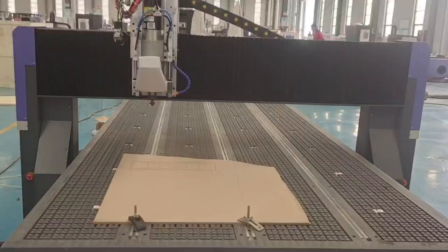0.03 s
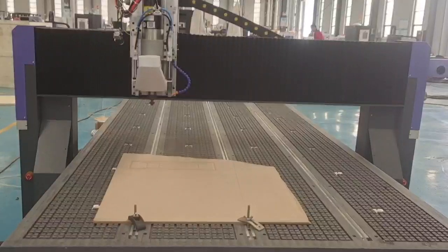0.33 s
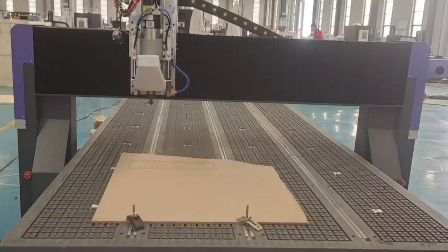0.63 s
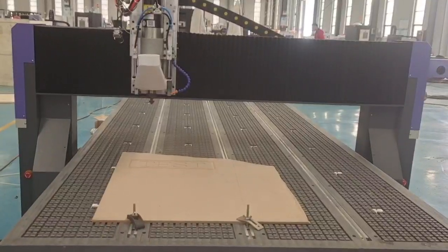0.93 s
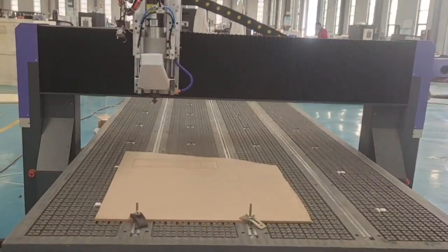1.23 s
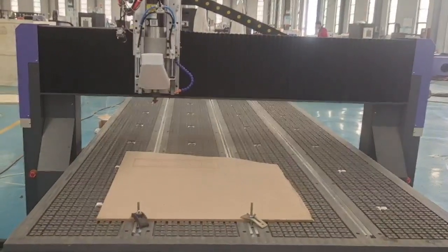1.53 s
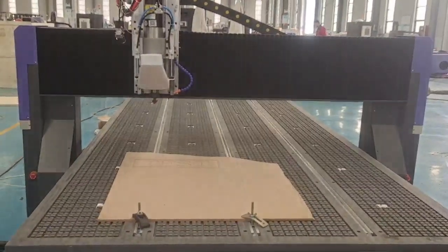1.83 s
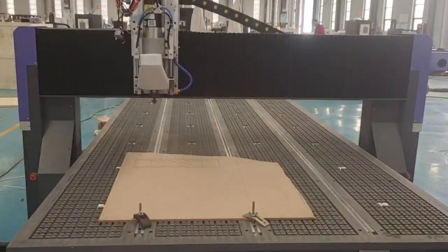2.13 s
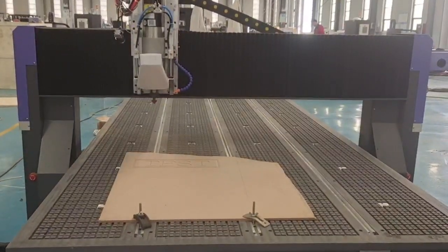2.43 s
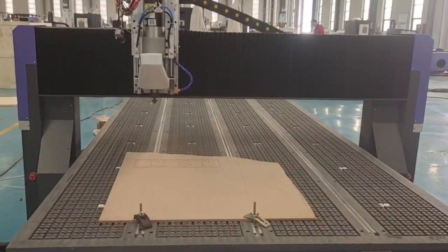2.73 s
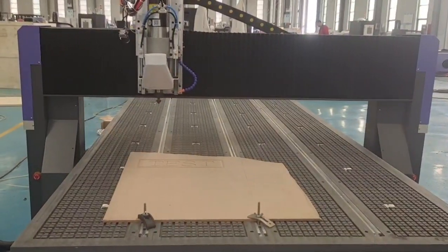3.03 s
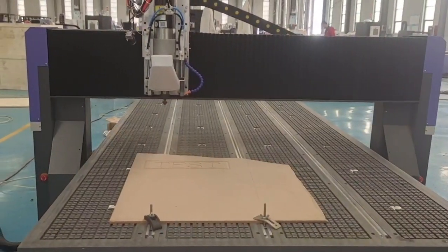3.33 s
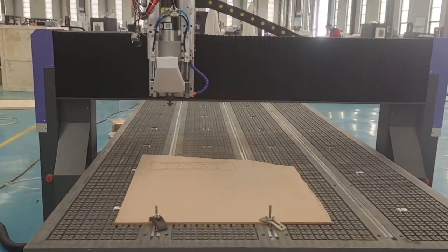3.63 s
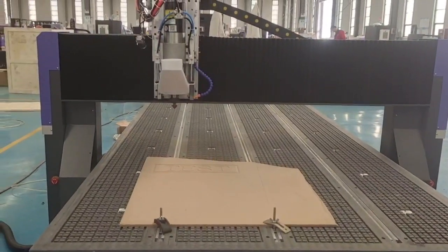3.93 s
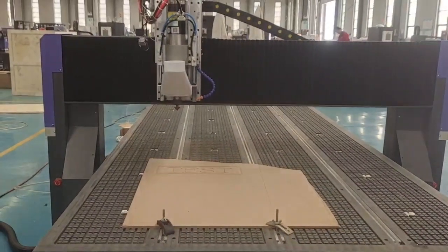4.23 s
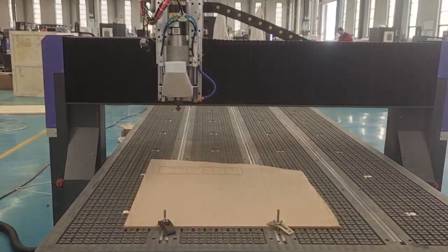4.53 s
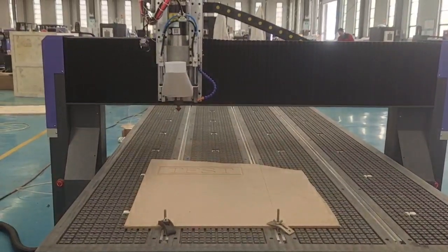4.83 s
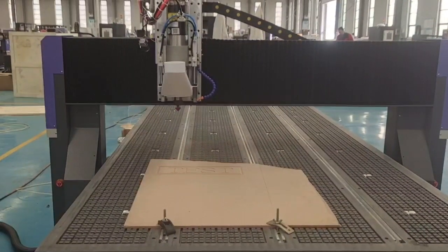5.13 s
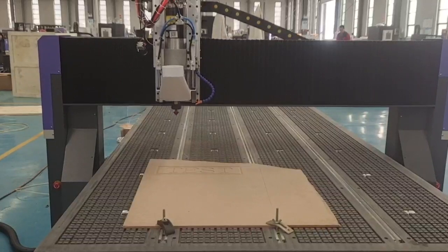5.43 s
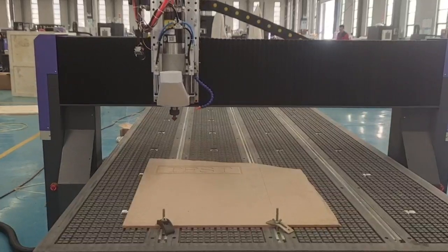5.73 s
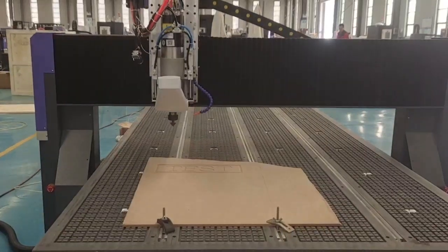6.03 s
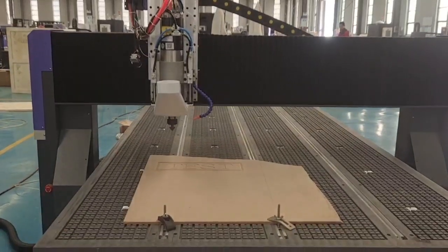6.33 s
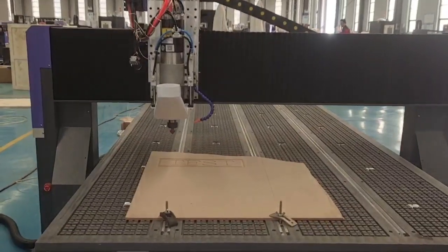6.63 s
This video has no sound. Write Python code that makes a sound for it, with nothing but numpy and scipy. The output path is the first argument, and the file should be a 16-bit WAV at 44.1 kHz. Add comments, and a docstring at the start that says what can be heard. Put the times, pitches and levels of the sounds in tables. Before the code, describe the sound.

A router spindle whines up in pitch to a loud hum in a factory hall, with air puffs and a late rattle.

```python
"""A CNC router spins up

The spindle runs up to full speed in a big factory hall. Unbalance makes it hum, and the hum swells
and fades as it sweeps through the hall's standing waves. Rotor slots and inverter whistle above it.
Compressed air puffs a few times; near full speed the bearings buzz and the head starts to rattle.
Machine parts ring, and behind it all the hall rumbles, a fan rushes and air hisses."""
import sys
import numpy as np
from scipy import signal
from scipy.io import wavfile
from scipy.ndimage import uniform_filter1d

SR = 44100
rng = np.random.default_rng(int(sys.argv[2]) if len(sys.argv) > 2 else 0)


def int16_out(signal):
    """Quantize to a 16-bit WAV file."""
    q = np.round(np.clip(np.atleast_2d(signal).T, -1, 1) * 32767)
    wavfile.write(sys.argv[1], SR, q.astype(np.int16))


N = 298998
START_S = .185
SIDES = np.array([[1], [-1]])   # left, right
# In the tables, pan is how much louder the left side is; lead is how far its wave runs ahead.

# The inverter (the motor's power supply) ramps up the turns per second: t/s, speed/Hz
SPEED_RAMP = [(0, 100.3), (5.245, 399.7), (5.9, 399.8), (6.3, 399.4), (6.78, 399.9)]
def spindle_speed():
    """Turns per second at every sample."""
    return in_time(SPEED_RAMP)[0]


# The hum between its dips: t/s, level/dB, pan/dB, lead/rad
HUM_CURVE = [(0.41, -62, 2, 0.39), (0.68, -52, -1, 0.19), (1.26, -55.5, -0.4, 0.29), (1.34, -39, 2, -0.14),
             (1.55, -42.5, -1, -0.15), (2.02, -36.5, -1, -0.082), (2.33, -26.5, 0, 0.18),
             (2.81, -22, -1, 0.2), (2.94, -33, -6, 0.54), (3.07, -23, 3, 0.39), (3.54, -26, -5, 0.57),
             (3.61, -24, -3.5, 0.39), (4.13, -22.5, 2, 0.063), (4.5, -14, 0, 0.42), (4.55, -23, 1, 0.29),
             (4.71, -15.5, -1, -0.0028), (5.05, -15, 0, 0.37), (5.61, -19, -2, 0.24),
             (5.69, -21.5, -3, 0.5), (6.04, -14.5, -2.5, 0.4), (6.51, -15, -1, 0.13),
             (6.78, -19.5, -0.5, 0.081)]
def shaft_hum(turns):
    """Unbalance shakes the head once a turn; the hum flutters while the speed climbs."""
    level_db, pan_db, lead = in_time(HUM_CURVE)
    gain, shift = standing_waves()
    flutter_db = climbing() * (1 - 1.5 * speed_octaves()) * drift(14.7)
    return gain * from_db(level_db + flutter_db) * pan(pan_db) * tone(turns + shift, lead)


# Dips in the hum: t/s, half width/s, depth/dB, right ear's delay/s
HUM_DIPS = [(1.397, 0.032, -17.5, -0.005), (1.465, 0.026, -4, -0.005), (1.69, 0.02, -23, -0.0064),
            (1.809, 0.017, -18, -0.0028), (2.247, 0.056, -5, -0.003), (2.415, 0.021, -9.5, -0.0024),
            (2.53, 0.086, -17.5, -0.0077), (2.64, 0.045, -9.5, -0.0089), (2.865, 0.081, -23, -0.008),
            (3.026, 0.051, -15.5, -0.017), (3.224, 0.026, -10.5, -0.015), (3.364, 0.022, -32.5, -0.002),
            (3.439, 0.024, -24, 0.0099), (3.804, 0.081, -13.5, -0.012), (3.964, 0.034, -13, -0.0024),
            (4.144, 0.047, -39, 0.012), (4.231, 0.024, -14.5, -0.0092), (4.381, 0.11, -28, 0.008),
            (4.446, 0.074, -23, -0.013), (4.906, 0.032, -9.5, -0.019), (4.985, 0.061, -8.5, -0.033),
            (5.153, 0.019, -12.5, -0.012), (5.261, 0.067, -27, 0.018), (5.345, 0.042, -14, -0.0014)]
def standing_waves():
    """The hall's echoes cancel the gliding hum, in each ear at its own moment: (gain, shift in cycles)."""
    path = np.ones((2, N), complex)
    for dip_s, width_s, depth_db, right_later_s in HUM_DIPS:
        away = (clock() - dip_s + SIDES * right_later_s / 2) / width_s
        path *= (away + 1j * from_db(depth_db)) / (away + 1j)
    return np.abs(path), np.angle(path) / (2 * np.pi)


# Higher tones of the hum: multiple of the speed, start t/s, level/dB, extra while climbing/dB,
# level while shaking/dB, pan/dB, lead at full speed/rad, lead while climbing/rad
OVERTONES = [(2, 3.9, 0, 4, -21, -3, -0.9, -0.5), (3, 2.5, 5.5, -1, -41, 2, 2.4, -0.6)]
def hum_overtones(turns, rise_s=0.11, db_per_octave=16):
    """Two overtones sweep through the gantry's resonances and swell when the head shakes."""
    shaking = swell(peak_s=6.37, spread_s=0.24)
    out = np.zeros((2, N))
    for order, start_s, db, load_db, shake_db, pan_db, steady_lead, climb_lead in OVERTONES:
        lead = steady_lead + (climb_lead - steady_lead) * climbing()
        drive_db = db + load_db * climbing() + db_per_octave * speed_octaves()
        running = ramp(start_s, rise_s) * gantry_gain(order * spindle_speed()) * from_db(drive_db)
        level = np.hypot(running, from_db(shake_db) * shaking)
        gain, shift = fading(share=0.15, rate=12)
        waver = from_db(drift(18))
        wave = tone(order * turns + shift, lead + 0.79 * drift(1.9))
        out += gain * level * waver * wave * pan(pan_db + 1.8 * drift(1.5))
    return out


# Pitches at which the gantry likes to vibrate: f/Hz, width/Hz, level/dB
GANTRY_RESONANCES = [(660, 95, -45), (745, 60, -34.5), (788, 26, -39), (836, 20, -30.5), (929, 55, -41.5),
                     (1064, 70, -51), (1190, 90, -49)]
def gantry_gain(hz):
    """The gantry, the bridge that carries the head, favours tones near its resonances."""
    gains = [from_db(db) / (1 + (2 * (hz - centre) / width) ** 2)
             for centre, width, db in GANTRY_RESONANCES]
    return np.sqrt(sum(gain ** 2 for gain in gains))


# How the motor housing passes on each pitch: f/Hz, level/dB, pan/dB, lead/rad
HOUSING_RESPONSE = [(2800, -68, -1, 1), (3150, -61, -1, 1.3), (3450, -55, 0, 1.7), (3750, -50, 0, 1.5),
                    (4000, -49, -3, 2), (4300, -43, -4, 1.7), (4500, -49, 2, .9), (4700, -57, 0, 2),
                    (4900, -42, 2, 2.7), (5100, -35.5, 3, 2.7), (5420, -37, 0, 2.8), (5620, -28, 2, 3),
                    (5780, -27, 1, 2.9), (5950, -29, 6, 2.3), (6200, -30.5, 1, 2.7), (6450, -36, 0, 2.9),
                    (6750, -38, 3, .7), (7000, -38.5, 3, 1), (7250, -39, 9, 2), (7550, -45, 10, 1.7),
                    (7850, -55, 5, .8), (8250, -52, 6, .2), (8500, -57, 3, 2), (8730, -47, 5, 1.4),
                    (9100, -51, 3, 1.5), (10500, -62, 0, 1.5)]
# The whistles: base f/Hz, multiple of the speed added to it, relative level/dB, start t/s
WHISTLE_TONES = [ (0, 22, 0, .6), (0, 26.025, -12, 1.5), (0, 28.025, -22, 1.6), (12000, -22, -22, 1.8),
                 (6000, 16, -19, .95), ]
def motor_whistle(turns, rise_s=0.14, unloaded_db=-20):
    """Rotor slots chop the magnetic field, and the inverter adds a rising and a falling tone."""
    housing_hz, *columns = np.transpose(HOUSING_RESPONSE)
    out = np.zeros((2, N))
    for base_hz, order, db, start_s in WHISTLE_TONES:
        hz = base_hz + order * spindle_speed()
        housing_db, pan_db, lead = [np.interp(hz, housing_hz, column) for column in columns]
        gain, shift = fading(share=0.35, rate=16)
        wave = tone(base_hz * clock() + order * turns + shift, lead)
        out += ramp(start_s, rise_s) * gain * from_db(db + housing_db) * pan(pan_db) * wave
    load_db = -0.5 + unloaded_db * (1 - climbing())   # quieter once the speed is steady
    return in_hall(out * from_db(load_db), wet_db=-5)


# Resonances that the buzz glides through: f/Hz, level/dB
BUZZ_SPECTRUM = [(1400, -50.5), (1600, -50.5), (1900, -52), (2000, -58), (2250, -56), (2400, -52),
                 (2600, -54.5), (2800, -46.5), (3000, -50), (3200, -52), (3600, -52), (3800, -68),
                 (4000, -52), (4200, -64), (4400, -55), (4700, -56.5), (5200, -59), (5600, -59.5),
                 (6000, -61.5), (6800, -56.5), (7200, -58), (7600, -75), (8800, -91)]
def bearing_buzz(turns, db_per_octave=17, early_db=-14):
    """The bearings break into a buzz near full speed and chirp while the speed climbs."""
    orders = np.arange(4, 23)
    level_db = db_per_octave * speed_octaves() + early_db * (1 - ramp(start_s=4.7, rise_s=0.08))
    tones_db = [at_hz(BUZZ_SPECTRUM, order * spindle_speed()) for order in orders]
    chirp = climbing()
    buzz = tone_stack(turns, orders, tones_db, waver_db=3.5 + 1.5 * chirp, jitter=0.026 + .05 * chirp)
    return from_db(level_db) * buzz


# Tones of the rattle: multiple of the speed, relative level/dB
RATTLE_TONES = [(.5, -48.5), (1.5, -34.5), (2.5, -44.5), (3.5, -49), (4.5, -56), (5.5, -56.5), (6.5, -51),
                (7.5, -50), (8.5, -52.5), (9.5, -74), (10.5, -67.5), (12.5, -56), (13.5, -71.5),
                (14.5, -68)]
# Noise of the rattle: f/Hz, relative level/dB
RUSTLE_SPECTRUM = [(60, -29.5), (150, -6), (230, -7.5), (300, -10), (380, -1), (480, 1), (650, -9.5),
                   (800, -1), (950, 1), (1300, -11.5), (2000, -24), (2900, -6.5), (4000, -21), (5200, -14),
                   (8000, -65.5), (15000, -47.5)]
def head_rattle(turns, tones_db=2, rustle_db=-37.5):
    """Slack in the head rattles on every second turn: its tones swell and fade, its rustle stays."""
    orders = np.arange(15) + .5
    tones = tone_stack(turns, orders, at_hz(RATTLE_TONES, orders), waver_db=3.5, jitter=0.035)
    tones *= from_db(tones_db) * swell(peak_s=6.19, spread_s=0.24)
    knocks = rms_one(1 + 0.32 * np.cos(np.pi * turns))   # the bright part of the rustle pulses
    bands = noise_bands(RUSTLE_SPECTRUM, flicker_db=.6)
    rustle = sum(band * (knocks if hz > 1500 else 1) for hz, band in bands)
    return tones + from_db(rustle_db) * rattling() * rustle


def rattling():
    """0 before the head starts to rattle, 1 once it does."""
    return ramp(start_s=5.19, rise_s=0.36)


# The puffs: t/s, level/dB, rise/s, hold/s, extra thud/dB, extra chatter/dB
PUFF_EVENTS = [(1.523, -52, 0.16, 0.1, 12, 1), (2.292, -38, 0.045, 0.098, 0.5, 2.5),
               (3.093, -46, 0.056, .05, -2, -7), (3.174, -32, 0.031, 0.064, 1, -2.5),
               (5.6, -40, 0.24, 0.05, -11.5, -2.5)]
# Their noise: f/Hz, relative level/dB
PUFF_SPECTRUM = [(50, -47), (160, 1.5), (300, -2.5), (500, -2), (750, -4), (1200, 5), (1700, -5.5),
                 (2800, 4), (3700, -9), (4600, -5.5), (6000, -22.5), (9000, -46), (15000, -55)]
def air_puffs(thud_hz=600, t60_s=1.6):
    """Compressed air swells, holds briefly and dies away in the hall, with a metallic chatter in it."""
    body, thud, metal = np.zeros((3, N))
    for start_s, db, rise_s, hold_s, thud_db, chatter_db in PUFF_EVENTS:
        tail_db = -60 * np.maximum(clock() - start_s - rise_s - hold_s, 0) / t60_s
        puff = ramp(start_s, rise_s) * from_db(db + tail_db)
        body = np.hypot(body, puff)   # overlapping puffs add in power
        thud = np.hypot(thud, puff * from_db(thud_db))
        metal = np.hypot(metal, puff * from_db(chatter_db))
    bands = noise_bands(PUFF_SPECTRUM, flicker_db=1.2)
    air = sum(band * (thud if hz < thud_hz else body) for hz, band in bands)
    return air + metal * chatter()


# Pitches of the loose metal: f/Hz, width/Hz, relative level/dB
METAL_RESONANCES = [(1086, 120, -5), (1379, 80, -9.5), (1866, 110, -10.5), (2470, 90, -5), (2790, 88, -1.5),
                    (3030, 74, -5), (3600, 130, -2), (3940, 210, -10), (4060, 99, -14.5),
                    (5100, 200, -12.5)]
def chatter(taps_per_s=110, spread_db=2):
    """Loose metal is tapped at random; each tap rings every pitch with its own strength."""
    taps = (rng.random(N) < taps_per_s / SR) * from_db(spread_db * rng.uniform(-1, 1, N))
    out = np.zeros((2, N))
    for hz, width_hz, db in METAL_RESONANCES:
        strikes = taps * spread(*rng.standard_normal((2, N)), hz)
        ring = signal.lfilter(*signal.iirpeak(hz, hz / width_hz, fs=SR), strikes + 1e-18)
        out += from_db(db) * rms_one(ring)
    return rms_one(in_hall(out, wet_db=7.5))


# Ringing machine parts: t/s, f/Hz, width/Hz, level/dB, time to fade by 60 dB/s
PART_RINGS = [(.185, 176, 34.6, -48, 1.4), (.185, 307.4, 66, -47.5, 1.7), (.3, 962, 25, -51, 2),
              (.44, 383, 40, -47, 0.49), (1.56, 640, 55, -45.5, 2.8), (1.58, 248, 40, -40.5, 0.62),
              (1.63, 2720, 220, -52, 1.9), (2.3, 166, 45.3, -42.5, 1.4), (2.33, 2780, 129, -39.5, 2.1),
              (2.54, 495, 50, -46.5, 1.4), (2.85, 2390, 80, -46.5, 1.5), (3.13, 762, 79.6, -32.5, 1.7),
              (3.17, 179, 61, -42, 1.5), (3.2, 2670, 100, -40, 1.9), (3.32, 590, 29.3, -43, 1.9),
              (3.851, 195, 50, -39, 0.86), (3.98, 198, 40, -42, 0.27), (4.73, 2980, 300, -47.5, 5),
              (5.15, 1357, 80, -46, 3), (5.2, 4370, 200, -44, 0.95), (5.331, 222.3, 34.6, -41.5, 6.6),
              (5.35, 1386, 44.5, -44.5, 3), (5.401, 4960, 448, -48.5, 9), (5.42, 827, 130, -41.5, 12),
              (5.55, 575, 80, -45, 3), (5.58, 4600, 1467, -43, 2.3), (5.9, 630, 50, -34, 1.3),
              (6.15, 720, 40, -32.5, .9), (6.17, 894, 110, -37.5, 10)]
def ringing_parts(rise_s=0.029):
    """Parts ring as the machine starts, takes air and shakes; each lingers in the hall."""
    out = np.zeros((2, N))
    for start_s, hz, width_hz, db, t60_s in PART_RINGS:
        age = np.maximum(clock() - start_s, 0)
        out += ramp(start_s, rise_s) * from_db(db - 60 * age / t60_s) * resonance(hz, width_hz)
    return out


# Rumble and rush over time: t/s, relative rumble level/dB, relative rush level/dB
AIR_LEVELS = [(.185, 5, 7), (.6, 5, 2), (1.4, 3.5, 1.5), (2.1, 3, 5.5), (2.8, 10.5, 7.5), (3.9, 11.5, 13.5),
              (4.7, 1.5, 5.5), (5.2, 2.5, 7.5), (5.8, -0.5, 3.5), (6.78, -15, -28)]
# The background noise: f/Hz, relative level/dB
AIR_SPECTRUM = [(30, -32), (80, -16), (160, -5), (300, -1), (600, -4), (1050, -6), (2000, -11), (2900, -5),
                (3800, -7), (5600, -2.5), (7300, -8), (9500, -17), (12000, -47), (15000, -17)]
# Pitches that sing in the hiss: f/Hz, width/Hz, relative level/dB
HISS_PEAKS = [(1730, 110, -65), (4430, 220, -56), (5510, 150, -57), (7270, 260, -58)]
def background_air(rumble_hz=250, rush_hz=800, hiss_hz=4500):
    """The hall rumbles, the fan rushes, and air hisses through the head, louder with speed."""
    closed = 1 - ramp(START_S, rise_s=0.22)
    hiss_db = 4 + 3 * speed_octaves() - 6 * closed
    levels_db = np.array([*in_time(AIR_LEVELS), hiss_db])
    anchors = np.log([rumble_hz, rush_hz, hiss_hz])
    out = np.zeros((2, N))
    for hz, band in noise_bands(AIR_SPECTRUM, flicker_db=.5):
        # each band blends the three levels by how near it lies to them
        shares = [np.interp(np.log(hz), anchors, row) for row in np.eye(3)]
        out += band * from_db(shares @ levels_db - 45.5)
    singing = sum(from_db(db) * resonance(hz, width_hz) for hz, width_hz, db in HISS_PEAKS)
    return out + from_db(hiss_db - 3) * singing


def bed_echo(x, delay_s=1 / 905, strength=.22):
    """An echo off the machine bed boosts some pitches and weakens others."""
    echo = np.array([np.interp(clock() - delay_s, clock(), side) for side in x])
    return (x + strength * echo) / np.hypot(1, strength)


def in_hall(x, wet_db, early_t60_s=0.089, tail_t60_s=1.2, early_share=0.85):
    """Mix in quick echoes off bed and gantry and the hall's long tail, at about the same total power."""
    t = np.arange(int(tail_t60_s * SR)) / SR
    early = early_share * from_db(-120 * t / early_t60_s) / early_t60_s
    tail = (1 - early_share) * from_db(-120 * t / tail_t60_s) / tail_t60_s
    echoes = rms_one(np.sqrt(early + tail) * rng.standard_normal((2, len(t)))) / np.sqrt(len(t))
    reverb = signal.fftconvolve(x, echoes, axes=1)[:, :N]
    wet = from_db(wet_db)
    return (x + wet * reverb) / np.hypot(1, wet)


def fading(share, rate):
    """A gliding tone meets changing echoes: (gain, shift in cycles)."""
    echoed = np.clip(share * climbing(), 0, 1)
    path = np.sqrt(1 - echoed) + np.sqrt(echoed / 2) * (drift(rate) + 1j * drift(rate))
    return np.abs(path), np.angle(path) / (2 * np.pi)


# How alike noise is in both ears: f/Hz, likeness (1 or more means the same wave)
EAR_LIKENESS = [(60, 5.5), (250, 1.1), (600, 0.5), (1100, 0.15), (2000, 0), (3200, 0.36), (5500, -0.54),
                (8000, 0.13), (15000, 0.2)]
# Which way it leans: f/Hz, pan/dB
EAR_BALANCE = [(60, -1.3), (400, -1.7), (1200, -0.97), (3000, 1.7), (6000, 1.9), (9000, 1.8), (13000, -1.5)]
def spread(mid, side, hz):
    """Two unrelated noises become one wide stereo sound."""
    alike = np.clip(at_hz(EAR_LIKENESS, hz), -1, 1)
    pair = np.sqrt((1 + alike) / 2) * mid + np.sqrt((1 - alike) / 2) * side * SIDES
    return pair * pan(at_hz(EAR_BALANCE, hz))


def noise_bands(spectrum, flicker_db):
    """Wide stereo noise as (Hz, band) pairs that flicker a little; together about rms 1."""
    edges = np.geomspace(40, 17000, 27)
    centres = np.sqrt(edges[1:] * edges[:-1])
    gains = from_db(at_hz(spectrum, centres))
    gains /= np.sqrt(np.sum(gains ** 2 * np.diff(edges)) / (SR / 2))
    white = rng.standard_normal((2, 2, N))
    for k, hz in enumerate(centres):
        band = signal.butter(2, edges[k:k + 2], "band", fs=SR, output="sos")
        mid, side = signal.sosfilt(band, white[k % 2])
        yield hz, spread(mid, side, hz) * gains[k] * from_db(flicker_db * drift(47))


def resonance(hz, width_hz):
    """Noise ringing around one pitch; rms 1."""
    band = signal.butter(2, [hz - width_hz / 2, hz + width_hz / 2], "band", fs=SR, output="sos")
    return rms_one(spread(*signal.sosfilt(band, rng.standard_normal((2, N))), hz))


def tone_stack(turns, orders, levels_db, waver_db, jitter):
    """Wavering tones at multiples (orders) of the speed; the high ones blur into hiss."""
    out = np.zeros((2, N))
    for order, db in zip(orders, levels_db):
        gain = from_db(db + waver_db * drift(15))
        lead = min(order / 2, 1.5) * rng.choice([-1, 1]) + .5 * drift(4.9)
        out += gain * tone(order * turns + jitter * np.sqrt(order) * drift(16), lead)
    return out


def tone(cycles, lead):
    """Stereo sine of rms 1; the left side leads by so many radians."""
    return np.sqrt(2) * np.sin(2 * np.pi * (cycles + rng.random()) + SIDES * lead / 2)


def climbing():
    """1 while the speed climbs, 0 once it is steady."""
    climb = np.gradient(spindle_speed())
    return uniform_filter1d(np.clip(climb / climb.max(), 0, 1), SR // 4)


def speed_octaves():
    """0 at full speed, -1 at half speed, -2 at a quarter."""
    speed = spindle_speed()
    return np.log2(speed / speed.max())


def drift(rate):
    """Slow random wander of typical size 1; a higher rate wanders faster."""
    pole = np.exp(-80 * np.pi * rate / SR)
    slow = signal.lfilter([1], [1, -2 * pole, pole * pole], rng.standard_normal(N // 40 + 2002))[2000:]
    return np.interp(np.arange(N) / 40, np.arange(len(slow)), rms_one(slow))


def ramp(start_s, rise_s):
    """A straight rise from 0 that stays at 1."""
    return np.clip((clock() - start_s) / rise_s, 0, 1)


def swell(peak_s, spread_s):
    """A smooth rise and fall of height 1."""
    return np.exp(-.5 * ((clock() - peak_s) / spread_s) ** 2)


def in_time(rows):
    """Each column of a time table at every sample."""
    times, *columns = np.transpose(rows)
    return [np.interp(clock(), times, column) for column in columns]


def at_hz(points, hz):
    """Read between a table's rows on a log axis."""
    pitches, values = np.transpose(points)
    return np.interp(np.log(hz), np.log(pitches), values)


def pan(db):
    """Left and right gains for a level difference."""
    return from_db(SIDES * db / 2)


def from_db(db):
    """Decibels to gain."""
    return 10 ** (np.asarray(db) / 20)


def rms_one(x):
    """Scale to an average power of 1."""
    return x / np.sqrt(np.mean(x ** 2) + 1e-20)


def clock():
    """Time of every sample."""
    return np.arange(N) / SR


def scene():
    """One shaft angle drives hum, whistles, buzz and rattle; air and ringing parts join them."""
    turns = np.cumsum(spindle_speed()) / SR + 0.0025 * drift(12)
    roughness = 1 + 0.042 * rattling() * drift(45)   # the rattle makes the hum uneven
    hum = in_hall(roughness * (shaft_hum(turns) + hum_overtones(turns)), wet_db=-22)
    spindle = hum + motor_whistle(turns) + bearing_buzz(turns) + head_rattle(turns)
    return spindle + bed_echo(background_air() + air_puffs()) + ringing_parts()


def record(dry, cutoff_hz=15600):
    """The sound begins after a short silence; the highest treble is cut."""
    lowpass = signal.ellip(12, .1, 90, cutoff_hz, fs=SR, output="sos")
    return signal.sosfilt(lowpass, dry * ramp(START_S, rise_s=.002))


dry = scene()
out = record(dry)
int16_out(out)
```